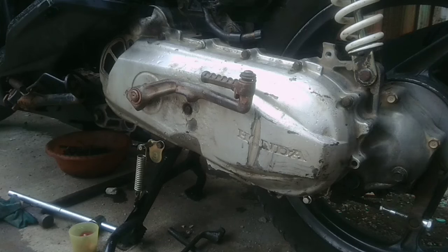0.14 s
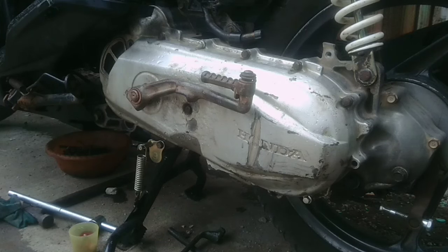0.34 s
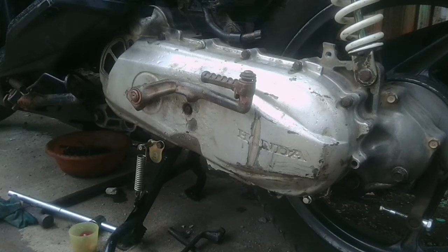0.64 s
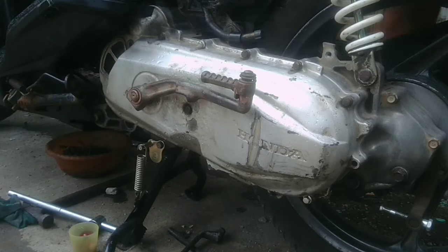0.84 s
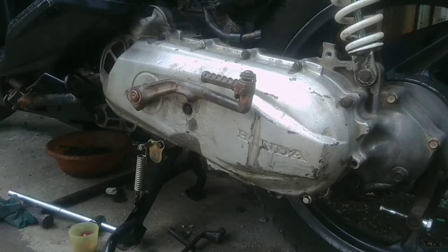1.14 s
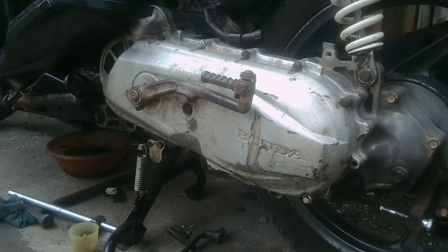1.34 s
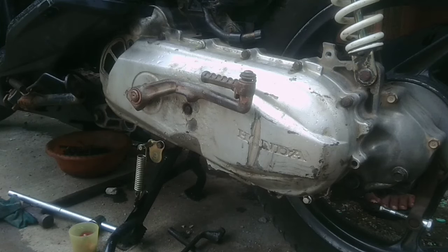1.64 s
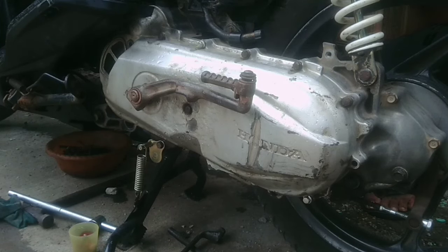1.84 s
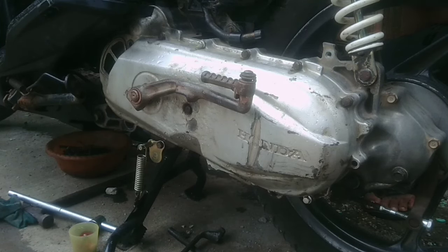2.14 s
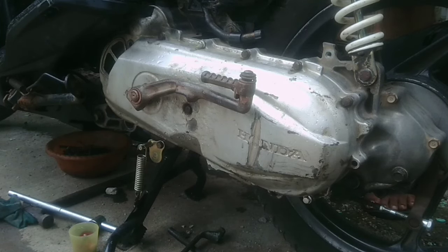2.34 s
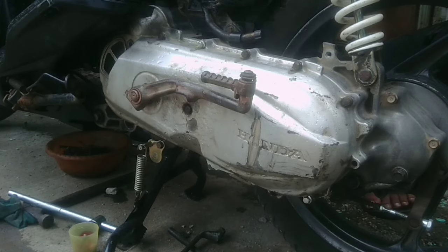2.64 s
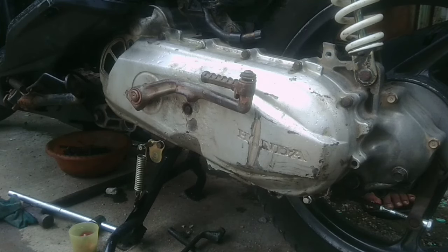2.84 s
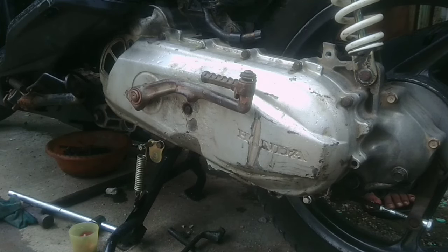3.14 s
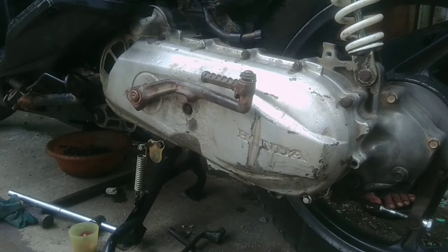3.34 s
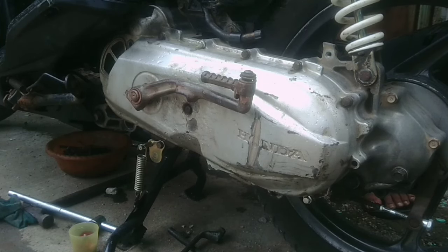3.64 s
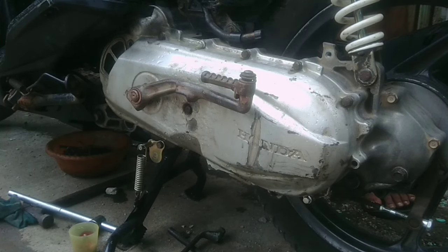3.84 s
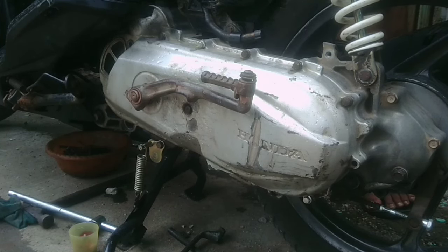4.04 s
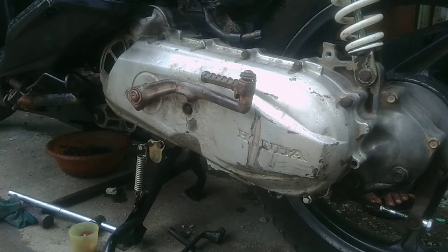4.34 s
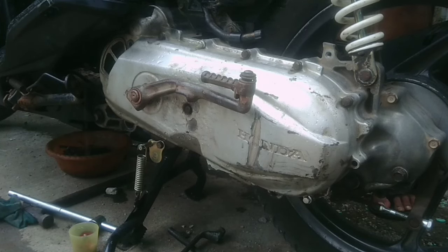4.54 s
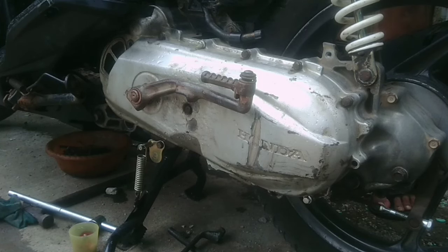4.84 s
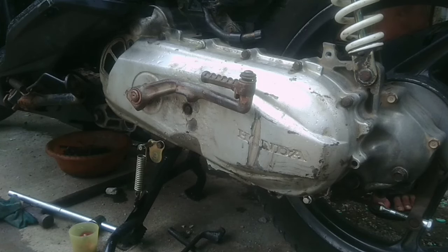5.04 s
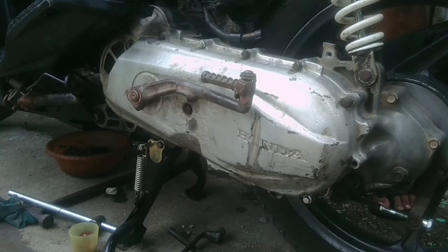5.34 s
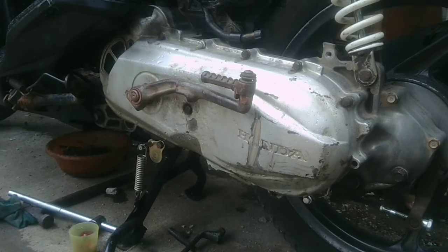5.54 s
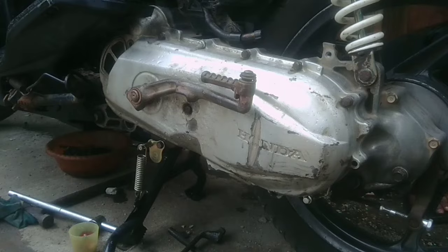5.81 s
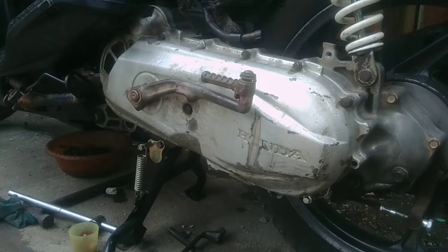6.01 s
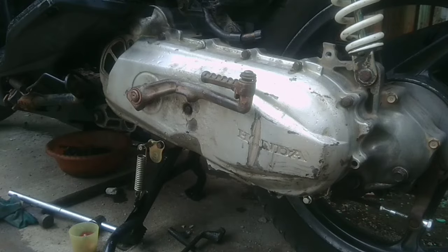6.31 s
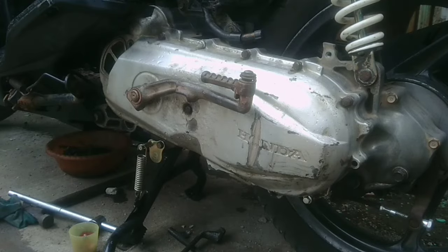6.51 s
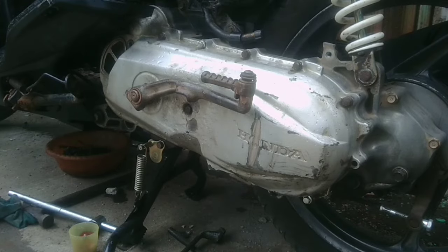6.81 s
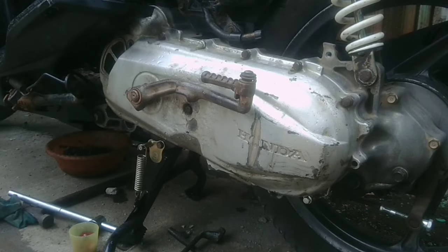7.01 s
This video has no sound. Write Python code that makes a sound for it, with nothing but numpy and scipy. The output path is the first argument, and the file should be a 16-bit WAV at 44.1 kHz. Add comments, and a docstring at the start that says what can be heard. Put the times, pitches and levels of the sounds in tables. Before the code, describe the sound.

In a small workshop, a scooter starter clacks and grinds three times through its metal casing, stalls twice, then spins free and whirs down.

```python
"""A low street rumble swells and fades (shaped noise) while small metal parts tick nearby (short rings).
Then a scooter's starter is tried three times in a workshop: the pinion clacks into mesh (bursts that ring the
casing), the gears grind through the alloy casing (dense random contacts), stall on compression and rock back.
At the last try the starter spins free and runs down with a hum, a whine and a singing cover; late ticks follow."""
import sys
import numpy as np
from scipy import signal
from scipy.fft import rfft, irfft, next_fast_len
from scipy.io import wavfile
from scipy.ndimage import uniform_filter1d, map_coordinates

SR = 44100
rng = np.random.default_rng(int(sys.argv[2]) if len(sys.argv) > 2 else 0)


def pcm_store(signal):
    """Save signal as 16-bit PCM."""
    levels = np.round(np.clip(np.atleast_2d(signal), -1, 1) * 32767)
    wavfile.write(sys.argv[1], SR, levels.astype(np.int16).T)


N = 316083

BITE_HZ, RASP_TOP_HZ = 4700, 15550  # soft contacts lose sound above the first; rasp and rattle end at the second
# borders between the low, middle, edge and top bands: f/Hz
SPLIT_HZ = 500, 2150, 7300


def amp(db):
    """Turn decibels into a plain gain."""
    return 10 ** (np.asarray(db) / 20)


def unit(x):
    """Scale to an average (RMS) strength of one."""
    return x / np.sqrt(np.mean(x ** 2) + 1e-20)


def along(points, hz):
    """Read a curve of (f/Hz, value) points on a log frequency axis."""
    f, v = np.transpose(points)
    return np.interp(np.log(hz + 1), np.log(f + 1), v)


def curves(rows):
    """One value per sample for each column after the time."""
    times, *columns = np.transpose(rows)
    return [np.interp(np.arange(N) / SR, times, column) for column in columns]


def sounding(rows):
    """One between the first and last row, with soft ends of 25 ms."""
    t = np.arange(N) / SR
    return np.clip(np.minimum(t - rows[0][0], rows[-1][0] - t) / 0.025, 0, 1)


def wobble(rate):
    """A smooth random curve with `rate` random points a second."""
    knots = rng.standard_normal(int(N * rate / SR) + 4)
    return map_coordinates(knots, [np.arange(N) * rate / SR])


def filtered(x, response):
    """Multiply the spectrum of x by a response of frequency."""
    m = next_fast_len(len(x) + SR // 4)
    return irfft(rfft(x, m) * response(np.fft.rfftfreq(m, 1 / SR)), m)[:len(x)]


def below(f, hz):
    """Smooth low-pass gain around hz."""
    return 1 / (1 + (f / hz) ** 10)


def modes(table, f):
    """Resonances (f/Hz, width/Hz, level/dB) of one struck body, added with alternating signs."""
    return sum((-1) ** k * amp(db) * 1j * f * w / (c * c - f * f + 1j * f * w)
               for k, (c, w, db) in enumerate(table))


def power_of(table, f):
    """Strength of resonances (f/Hz, width/Hz, level/dB) that ring independently."""
    return np.sqrt(sum(amp(2 * db) * (f * w) ** 2 / ((c * c - f * f) ** 2 + (f * w) ** 2)
                       for c, w, db in table))


def noise(spectrum):
    """Steady noise coloured by a curve of (f/Hz, level/dB per Hz)."""
    return unit(filtered(rng.standard_normal(N), lambda f: amp(along(spectrum, f))))


# deep street rumble: t/s, level/dB
DEEP_LEVEL = [(0.0, -56), (0.39, -56), (0.55, -59.5), (0.71, -58.5), (1.09, -62.5), (1.35, -60), (1.8, -67),
              (2.07, -73), (2.33, -67), (3.27, -62.5), (4.56, -66), (6.3, -63.5), (6.44, -69.5),
              (6.62, -65.5), (6.77, -67.5), (7.167, -68)]
# a vehicle goes by, heard in the upper register: t/s, level/dB
PASSING_LEVEL = [(0.0, -73), (0.1, -70.5), (0.55, -61.5), (1.09, -69), (1.35, -62.5), (1.8, -92),
                 (7.167, -90.5)]
# colours of the deep rumble, the upper rumble and the hiss: f/Hz, relative level/dB per Hz
DEEP_COLOUR = [(12, -55.5), (20, -35.5), (27, -16.5), (102, 3.5), (124, 4.5), (188, -4), (239, -17.5),
               (260, -19.5), (340, -43.5), (570, -120)]
UPPER_COLOUR = [(150, -40.5), (200, -0.5), (260, -2.5), (320, -14.5), (380, -30), (500, -58)]
HISS_COLOUR = [(260, -35), (450, 0.5), (589, -2.5), (644, -3), (2400, -11), (16000, -22.5)]


def street():
    """Low rumble from outside: two bands of noise that swell unevenly, over a faint hiss."""
    deep_db, upper_db = curves(DEEP_LEVEL)[0], curves(PASSING_LEVEL)[0]
    deep = amp(deep_db + 0.6 * wobble(7.1)) * noise(DEEP_COLOUR)
    upper = amp(upper_db + 2.0 * wobble(13.0)) * noise(UPPER_COLOUR)
    hiss = amp(-88.5 + 0.48 * wobble(23)) * noise(HISS_COLOUR)
    return deep + upper + hiss


# how long the room's answer takes to fall by 60 dB: f/Hz, t60/s
ROOM_DECAY = [(200, .2), (2000, .16), (10000, .1)]


def shop(x):
    """The workshop's answer: decaying noise in which each frequency dies at its own speed."""
    hz, t, z = signal.stft(rng.standard_normal(SR // 2), SR, nperseg=256)
    fade = amp(-60 * t / along(ROOM_DECAY, hz)[:, None])
    tail = signal.istft(z * fade, SR, nperseg=256)[1]
    late = np.pad(x, (300, 0))  # the answer comes 300 samples late
    return signal.fftconvolve(late, tail / np.linalg.norm(tail))[:N]


# touches of small parts: t/s, level of the ring/dB, ring f/Hz, treble level against the ring/dB
TICK_EVENTS = [(0.048, -74.5, 1340, 15), (0.099, -82, 1330, 20), (0.165, -60, 1324, 5),
               (0.191, -60.5, 1400, -2), (0.209, -64, 1370, 0), (0.251, -64, 1400, 8),
               (0.259, -68, 1380, 20), (0.276, -59.5, 1350, 21), (0.3, -80, 1350, 7), (0.325, -77, 1370, 7),
               (0.419, -75, 620, -15), (0.899, -77, 1570, 4), (1.436, -58, 770, 5.5),
               (1.443, -53.5, 717, -2), (1.455, -60, 745, 1), (1.48, -54, 707, -14), (1.655, -71, 615, -22),
               (1.999, -79, 2180, 8), (2.047, -73, 394, -37), (6.678, -76.5, 1950, 3),
               (6.939, -81, 830, 0.5), (6.972, -68.5, 1089, 7), (6.982, -64, 1480, -7.5),
               (7.011, -56, 1482, -15.5), (7.027, -71, 1295, -4), (7.039, -70.5, 1483, -5)]
# chinking resonances: f/Hz, width/Hz, relative level/dB
CHINK_MODES = [(1870, 51, -10.5), (2170, 46, -1.5), (2850, 63, -2.5), (3180, 110, -9.5), (4230, 300, -10),
               (5220, 190, 2.5)]
# treble rattle of loose parts: f/Hz, relative level/dB per Hz
RATTLE_COLOUR = [(3240, -56), (5500, -13.5), (6880, -1.5), (8000, -17.5), (8950, -11.5), (11100, -11),
                 (11500, -20), (12200, -1.5), (15400, -7.5)]
CHINK_DB, CHINK_FOLLOWS = 0.5, 0.35  # chink against ring; share of the treble level it follows
TICK_T60_S, SNAP_T60_S = 0.19, 0.022  # slow and quick part of the fade


def ticks():
    """Light touches of loose parts: a rough low ring, a cluster of chinks and a treble rattle."""
    out, t = np.zeros(N + SR), np.arange(SR // 4) / SR
    fade = 0.3 * amp(-60 * t / TICK_T60_S) + amp(-60 * t / SNAP_T60_S)
    fade = fade * (1 - np.exp(-t / 0.00058))

    def peak(v):
        """Scale to a peak of one."""
        return v / np.abs(v).max()

    for start, db, hz, treble_db in TICK_EVENTS:
        chink_db = CHINK_DB + CHINK_FOLLOWS * treble_db  # brighter touches chink more
        rattle = fade * rng.standard_normal((3, len(t)))
        pair = [(hz, 130, 0), (hz * 1.284, 130, -6)]
        ring = filtered(rattle[0], lambda f: modes(pair, f) ** 2)
        # each touch wakes a slightly different set of small modes
        near = [(c, w, g + rng.normal(0, 1.9)) for c, w, g in CHINK_MODES]
        near += [(c, 120, -6) for c in rng.uniform(1130, 6000, size=5)]
        chink = filtered(rattle[1], lambda f: modes(near, f) * below(f, 6000) * (1 - below(f, 900)))
        high = [(c, 160, 4) for c in rng.uniform(5940, 17000, size=12)]
        sizzle = filtered(rattle[2], lambda f: amp(along(RATTLE_COLOUR, f))
                          * (0.15 + power_of(high, f)) * (f < RASP_TOP_HZ))
        touch = peak(ring) + amp(chink_db) * peak(chink) + amp(treble_db) * peak(sizzle)
        out[round(start * SR):][:len(t)] += amp(db) * touch
    return out[:N]


# the frame jolts on its stand: t/s, level/dB, f/Hz, t60/s
JOLT_EVENTS = [(2.656, -29.5, 127.5, 0.084), (2.695, -36.5, 140, 0.077), (2.798, -36.5, 248, .1),
               (2.839, -46.5, 120, 0.11), (3.07, -48, 115, 0.16), (3.461, -32, 203, 0.059),
               (3.498, -30, 128, 0.11), (3.664, -31.5, 143, 0.063), (3.692, -34, 116, 0.13),
               (3.81, -44, 109, 0.23), (3.93, -56, 232, 0.24), (4.049, -46, 138.7, 0.16),
               (4.273, -53, 179.2, .09), (4.589, -43, 149.8, 0.088), (4.763, -31, 149, 0.12),
               (4.793, -31.5, 141, 0.14), (4.858, -34.5, 103, 0.061), (4.9, -42.5, 250, 0.23),
               (5.09, -42.5, 129, 0.16), (5.111, -36.5, 345, 0.13), (5.283, -37.5, 92, .073)]


def jolts():
    """Soft low thumps: a fading sine with a higher, shorter second mode."""
    out, t = np.zeros(N + SR), np.arange(SR // 2) / SR
    for start, db, hz, t60 in JOLT_EVENTS:
        second = 0.63 * np.sin(2 * np.pi * 5.8 * hz * t) * amp(-60 * t / 0.042)
        ring = np.sin(2 * np.pi * hz * t) + second
        out[round(start * SR):][:len(t)] += amp(db - 60 * t / t60) * (1 - np.exp(-t / 0.0014)) * ring
    return out[:N]


# blows on the casing: t/s, level below the edge band/dB, treble level against it/dB, t60/s
BLOW_EVENTS = [(2.647, -21, -2.5, 0.08), (2.656, -13, 7.5, 0.035), (2.693, -22, -9, 0.046),
               (2.741, -28.5, -3, 0.027), (2.836, -38, -39, .032), (3.073, -65, -1.5, 0.053),
               (3.173, -49.5, -27.5, 0.05), (3.429, -42, -10, 0.065), (3.453, -20, -2.5, 0.22),
               (3.461, -15, 10.5, 0.022), (3.616, -47, -12.5, 0.046), (3.661, -19, -9.5, 0.051),
               (3.688, -23.5, -13, 0.041), (3.928, -24, -19, 0.098), (4.029, -47, -36.5, .04),
               (4.268, -44.5, -32.5, .04), (4.341, -39.5, -25, 0.024), (4.371, -33, -16, .05),
               (4.407, -45.5, -18, 0.046), (4.589, -58, -42.5, .2), (4.725, -42.5, -10.5, 0.035),
               (4.76, -12, 5.5, 0.027), (4.794, -25.5, -9, 0.04), (4.814, -30, -2.5, 0.03),
               (5.019, -36, -12, 0.11), (5.08, -39, -20, 0.038), (5.11, -25, -7.5, 0.028),
               (5.246, -36, -6.5, 0.05)]
# broad colour of a clack: f/Hz, relative level/dB per Hz
CLACK_COLOUR = [(180, -48.5), (300, -16), (1110, -9.5), (1430, -11), (2240, -10), (2560, -0.5), (4540, -8),
                (4930, -1.5), (6130, -3), (8160, -13.5), (13500, -0.5), (15200, -0.5), (16500, -50)]
# resonances of the alloy casing, also used by the gears: f/Hz, width/Hz, relative level/dB
CASING_MODES = [(540, 35, -10), (878, 52, -5), (1085, 30, -4), (1250, 41, -1), (1395, 50, -7),
                (1670, 55, -6), (1882, 40, -6), (2150, 90, -7), (2540, 70, -7), (2788, 42, -6),
                (3149, 65, -12), (3490, 150, -9), (3980, 90, -5), (4250, 60, -7), (4480, 200, -10),
                (4990, 80, -9), (5280, 100, -14), (5745, 70, -10), (6260, 140, -21), (6540, 66, -22),
                (7110, 200, -23), (9020, 81, -25), (9910, 110, -25), (10600, 180, -18), (11500, 180, -16),
                (12400, 120, -18), (13060, 100, -22), (13700, 110, -21), (14700, 180, -19),
                (15300, 110, -22)]
BLOW_RISE_MS, EDGE_DB, EDGE_FOLLOWS = 2.5, 3, 0.41  # the edge follows the treble part of the way


def blows():
    """Each blow is a burst of contacts that builds up in a few ms and rings the casing; soft ones are dull."""
    out, t = np.zeros(N + SR), np.arange(SR // 4) / SR
    rise = 1 - np.exp(-(t * 1000 / BLOW_RISE_MS) ** 2)
    for start, db, treble_db, t60 in BLOW_EVENTS:
        edge_db = EDGE_DB + EDGE_FOLLOWS * treble_db
        soft = amp(0.72 * min(treble_db - edge_db, 0))  # gain above BITE_HZ
        burst = amp(-60 * t / t60) * rise * rng.standard_normal(len(t))
        hit = filtered(burst, lambda f: (amp(along(CLACK_COLOUR, f)) + 0.32 * modes(CASING_MODES, f))
                       * (below(f, BITE_HZ) + soft * (1 - below(f, BITE_HZ))))
        low, mid = [filtered(hit, lambda f: below(f, hz)) for hz in SPLIT_HZ[1:]]
        bands = np.array([low, mid - low, hit - mid])
        # peak estimate: three times the strongest 4 ms average
        crest = 3 * np.sqrt(np.max(uniform_filter1d(bands ** 2, size=SR // 250), axis=1))
        gains = amp([db, db + edge_db, db + treble_db]) / crest
        out[round(start * SR) - 60:][:len(t)] += gains @ bands  # the build-up begins 60 samples early
    return out[:N]


def tone(hz, span, db, waver, orders):
    """A slightly unsteady rotation tone; orders are (multiple of hz, relative level/dB)."""
    phase = 2 * np.pi * np.cumsum(hz * (1 + waver * wobble(30))) / SR
    partials = sum(amp(g + 2.5 * wobble(25)) * np.sin(k * phase) for k, g in orders)
    return np.sqrt(2) * amp(db) * sounding(np.transpose([span])) * partials


# speed of the free-spinning shaft, also used for the grind: t/s, f/Hz
SHAFT_SPEED = [(5.24, 95), (5.33, 125), (5.39, 149), (5.468, 167), (5.618, 189), (5.75, 181), (5.898, 138),
               (6.02, 110), (6.14, 71), (6.22, 52), (6.33, 24)]
# partials of the shaft hum: multiple of the shaft speed, relative level/dB
SHAFT_ORDERS = [(1, 0), (3, -9)]
# swell of the singing cover, before its parts are mixed: t/s, level/dB
COVER_LEVEL = [(5.22, -47), (5.43, -52), (5.8, -42.5), (6.24, -46), (6.34, -70), (6.44, -91)]
# further cover resonances, one below the main pitch and four above:
# f/Hz, width/Hz, relative level/dB before a common lift
COVER_SIDE_MODES = [(615, 31, -12), (2820, 37, -12), (4045, 81, -6), (4830, 66, -17), (5320, 63, -15)]
HUM_S, HUM_DB = (5.33, 5.99), -57  # the shaft hums while it is fast
WHINE_S, WHINE_DB, WHINE_MULTIPLE = (5.93, 6.23), -58, 7.68  # the mesh whines in the run-down
COVER_HZ, COVER_WIDTH_HZ = 1245, 32


def free_spin():
    """Unloaded shaft hum, mesh whine tied to its speed, and a cover plate that sings at its own pitches."""
    def ringing(hz, width):
        """Noise ringing one mode of the plate."""
        return unit(filtered(rng.standard_normal(N), lambda f: modes([(hz, width, 0)], f) ** 2))

    plate = ringing(COVER_HZ, COVER_WIDTH_HZ)
    plate = plate + sum(amp(db + 1) * ringing(c, w) for c, w, db in COVER_SIDE_MODES)
    steady = np.sqrt(2) * np.sin(2 * np.pi * COVER_HZ * np.arange(N) / SR + 1.37 * wobble(40))
    cover = amp(curves(COVER_LEVEL)[0]) * sounding(COVER_LEVEL) * (0.5 * plate + 0.8 * steady)
    shaft_hz, = curves(SHAFT_SPEED)
    hum = tone(shaft_hz, HUM_S, HUM_DB, 0.015, SHAFT_ORDERS)
    whine = tone(WHINE_MULTIPLE * shaft_hz, WHINE_S, WHINE_DB, 0.031, [(1, 0.0031)])
    return hum + whine + cover


def column(values):
    """Stand a list upright: one row for each gear layer."""
    return np.array(values)[:, None]


# Layer lists run: rumble, grind, edge, sizzle, low crank, high crank.
# turns of the gear train: start t/s, length t/s, start and end level/dB (before the layer offsets),
# start and end speed (0 to 1)
TURNS = [(2.618, 0.039, -64.5, -29.5, 1, 0.58), (2.673, 0.13, -43.5, -34, 1, 0.72),
         (2.833, 0.036, -45.5, -42.5, 0.18, 0.29), (3.074, 0.026, -58.5, -61.5, 0, .05),
         (3.103, 0.026, -55.5, -54, 0.3, 0.26), (3.119, 0.084, -58, -67, 0.23, 0.19),
         (3.427, 0.033, -61, -40.5, .8, 0.5), (3.476, .028, -44, -31, 0.2, 0.47),
         (3.577, 0.087, -55.5, -40, 0.52, 0.91), (3.664, 0.261, -37.5, -37.5, 0.79, 0.97),
         (3.922, 0.036, -33.5, -34.5, 0.8, 0.59), (4.001, 0.029, -58, -48, 0.5, 0.26),
         (4.032, 0.041, -44, -47, 0.34, 0.29), (4.083, 0.072, -60.5, -69, 0, 0.27),
         (4.181, 0.057, -60.5, -56, 0.1, .12), (4.254, 0.056, -55, -46.5, 0.23, 0.51),
         (4.336, 0.014, -57, -53, 0.64, .3), (4.37, 0.0081, -46.5, -42.5, 0.75, 0.7),
         (4.401, .08, -63, -69, 0.5, 0.52), (4.587, 0.044, -71, -72.5, 0, .03),
         (4.718, 0.047, -55.5, -43, 0.66, 0.94), (4.78, 0.06, -37.5, -37.5, 0.8, 0.56),
         (4.85, .175, -47, -35, 0.97, 0.91), (5.032, 0.11, -44.5, -32.5, 1, 0.72),
         (5.198, 0.057, -58.5, -42.5, 0.6, 0.85)]
# layer offset at full speed, and loss from full speed to standstill: level/dB
FULL_DB = [-13.5, 0.5, 2.5, -2.5, -21, -16.5]
SLOW_DB = [-14, 0, 15, 31.5, -9.5, -2]
# extra loss at standstill, growing below CREEP_SPEED so that only the low modes wake: level/dB
CREEP_DB = [0, 0, 16, 0, 3, 20]
# drop of each layer when a full-speed turn stops: level/dB
STOP_DB = [10, 20, 14, 26, 10, 30]
# how long each layer then rings out: t60/s
RING_OUT = [.2, .22, .2, .26, .3, .33]
TURN_ATTACK_S, STOP_S, CREEP_SPEED = 0.0054, 0.006, 0.2


def loaded_power():
    """Power of each layer in loaded turns, which bite fast, stop fast and let the casing ring out."""
    t, power = np.arange(N) / SR, np.zeros((len(FULL_DB), N))
    for start, length, from_db, to_db, from_speed, to_speed in TURNS:
        heard = slice(round((start - TURN_ATTACK_S) * SR), round((start + length) * SR) + SR // 2)
        since = t[heard] - start
        after = np.maximum(since - length, 0)
        done = np.clip(since / length, 0, 1)
        slowness = 1 - from_speed - (to_speed - from_speed) * done
        db = from_db + (to_db - from_db) * done + column(FULL_DB) - column(SLOW_DB) * slowness
        db = db - column(CREEP_DB) * np.clip(1 - (1 - slowness) / CREEP_SPEED, 0, 1)
        db = db - column(STOP_DB) * to_speed * (1 - np.exp(-after / STOP_S))
        db = db - 60 * after / column(RING_OUT)
        attack = np.clip(1 + since / TURN_ATTACK_S, 0, 1) ** 2
        power[:, heard] += (amp(db) * attack) ** 2
    return power


# unloaded layers: offset at top speed, and loss from there to standstill: level/dB
SPIN_FULL_DB = [-16, 0, -0.5, -8.5, -31, -25]
SPIN_SLOW_DB = [12, -2, -0.5, 8, 0, 12]
# how long each layer rings out after the last point of the shaft speed curve: t60/s
SPIN_RING_OUT = [.2, 0.17, 0.19, .12, 0.26, 0.19]
SPIN_TOP_HZ, SPIN_DB = 183, -38.5  # reference top speed, and level there before the layer offsets
SPIN_SLOPE_DB = 25.5  # loss per tenfold slowing
CHATTER_HZ, CHATTER_DB = 145, 2  # below this speed the teeth catch unevenly
SPIN_UP_S = 5.33  # the grind swells by 60 dB a second up to here
POWER_OFF_S = 5.62  # until then the motor keeps the teeth pressed as at top speed


def spin_gain():
    """Gain of each layer in the free spin: the slower the shaft, the weaker the contacts."""
    t = np.arange(N) / SR
    hz = np.where(t < POWER_OFF_S, SPIN_TOP_HZ, curves(SHAFT_SPEED)[0])
    db = SPIN_DB + SPIN_SLOPE_DB * np.log10(hz / SPIN_TOP_HZ)
    db = db - 60 * np.maximum(SPIN_UP_S - t, 0)
    db = db + CHATTER_DB * np.clip(1 - hz / CHATTER_HZ, 0, 1) * wobble(35)
    db = db + column(SPIN_FULL_DB) - column(SPIN_SLOW_DB) * (1 - hz / SPIN_TOP_HZ)
    db = db - 60 * np.maximum(t - SHAFT_SPEED[-1][0], 0) / column(SPIN_RING_OUT)
    return amp(db) * sounding([SHAFT_SPEED[0], [N / SR]])


def shifting(x, depth_db):
    """The point of contact wanders, so the modes it feeds swell and fade in turn."""
    z = signal.stft(x, nperseg=512)[2]
    field = uniform_filter1d(rng.standard_normal(z.shape), size=4, axis=0)
    field = uniform_filter1d(field, size=10, axis=1)
    return signal.istft(z * amp(depth_db * unit(field)), nperseg=512)[1][:N]


# broad colour of tooth contacts: f/Hz, relative level/dB per Hz
TEETH_COLOUR = [(59, -33.5), (100, -13.5), (166, -6.5), (410, -11.5), (527, -3.5), (1150, 0), (1250, -12.5),
                (1510, -5), (4060, -7), (7640, -27), (11200, -19.5), (15300, -21)]
# crank resonances, heard most in slow turns; the first two are the low ones: f/Hz, width/Hz, relative level/dB
CRANK_MODES = [(1100, 90, -7), (1850, 90, 0), (2800, 60, -4), (3450, 60, -3), (3900, 260, -1),
               (4250, 300, -1), (5700, 50, -13)]


def gears():
    """Dense uneven tooth contacts shake the casing; slow, loaded turns sound dull and fast ones bright."""
    gains = np.sqrt(loaded_power() + spin_gain() ** 2)
    rumble_gain, grind_gain, edge_gain, sizzle_gain, *crank_gains = gains
    contacts = (rng.random(N) < 3000 / SR) * rng.standard_normal(N)  # about 3000 a second
    force = unit(contacts) + 1.05 * rng.standard_normal(N)
    force = force * amp(0.6 * wobble(18))
    force = shifting(force * amp(0.7 * wobble(60) + 0.21 * wobble(250)), depth_db=2.0)
    body = filtered(force, lambda f: np.hypot(0.3 * amp(along(TEETH_COLOUR, f)), power_of(CASING_MODES, f))
                    * (f < RASP_TOP_HZ))
    lows = [filtered(body, lambda f: below(f, hz)) for hz in SPLIT_HZ]
    rumble, grind = unit(lows[0]), unit(lows[1] - lows[0])
    edge, sizzle = unit(lows[2] - lows[1]), unit(body - lows[2])
    crank_parts = np.split(np.array(CRANK_MODES), [2])
    crank = sum(gain * unit(filtered(force, lambda f: power_of(part, f) ** 2))
                for gain, part in zip(crank_gains, crank_parts))
    # soft contacts lose the top of the edge first
    bite = filtered(edge, lambda f: 1 - below(f, BITE_HZ))
    bite_gain = np.minimum(amp(9.5) * sizzle_gain / (edge_gain + 1e-9), 1)
    edge = edge + (bite_gain - 1) * bite
    return rumble_gain * rumble + grind_gain * grind + edge_gain * edge + sizzle_gain * sizzle + crank


def scene():
    """Hits with the room's answer, then the gears, the free spin and the street."""
    hits = blows() + jolts() + ticks()
    return (hits + amp(-19.5) * shop(hits) + gears() + free_spin() + street())[None]


def record(dry):
    """Nothing at or above 16640 Hz is kept."""
    return filtered(dry[0], lambda hz: hz < 16640)[None]


dry = scene()
out = record(dry)
pcm_store(out)
```